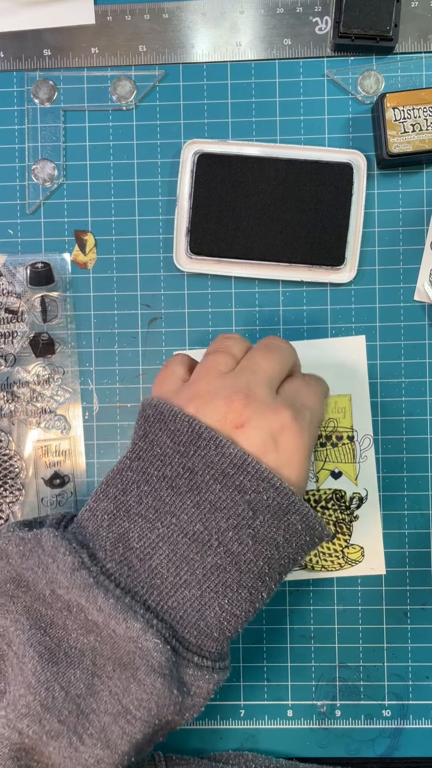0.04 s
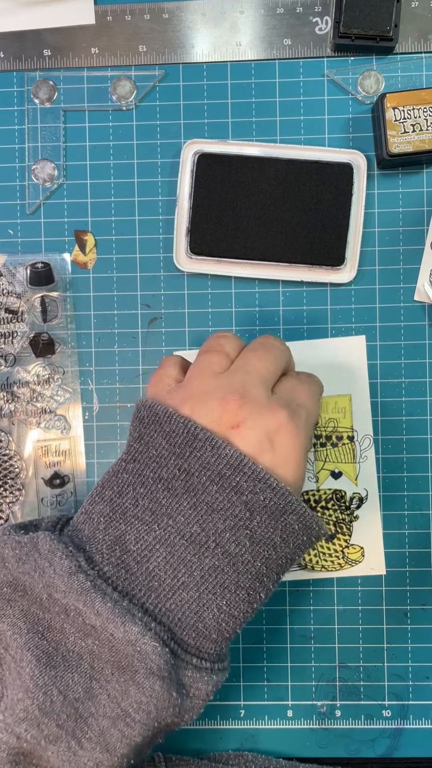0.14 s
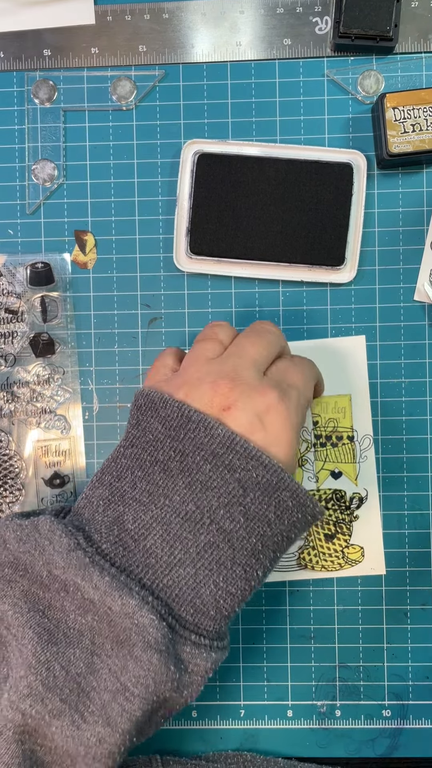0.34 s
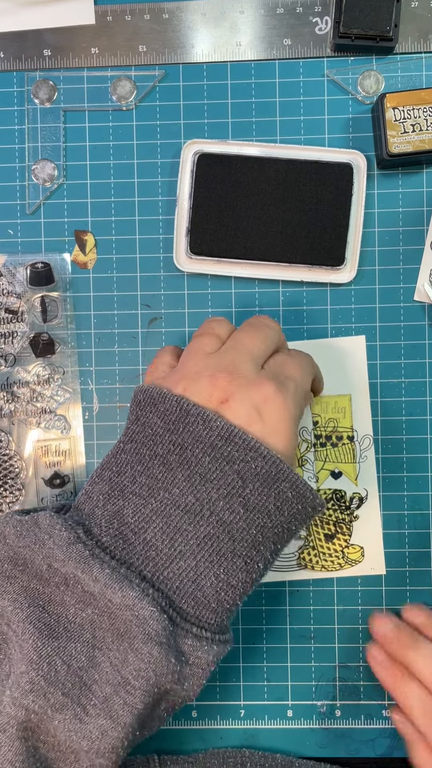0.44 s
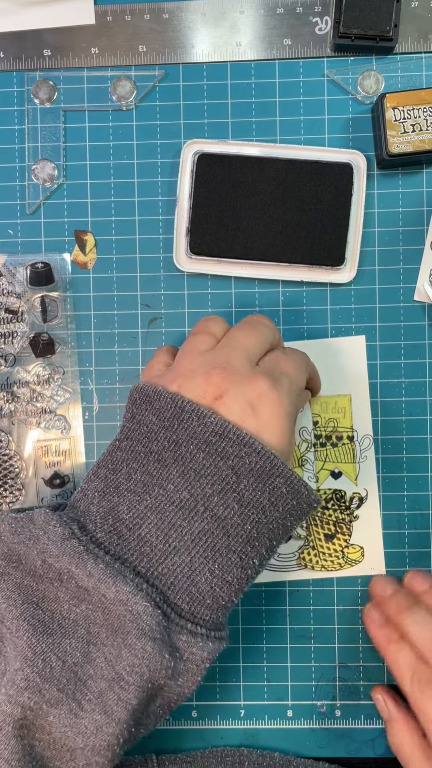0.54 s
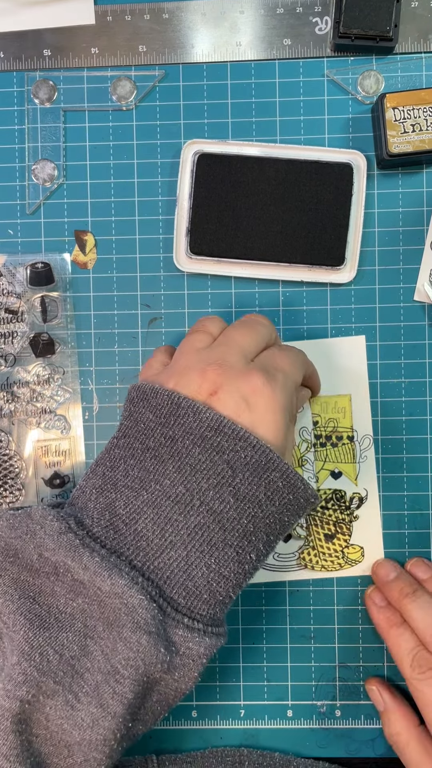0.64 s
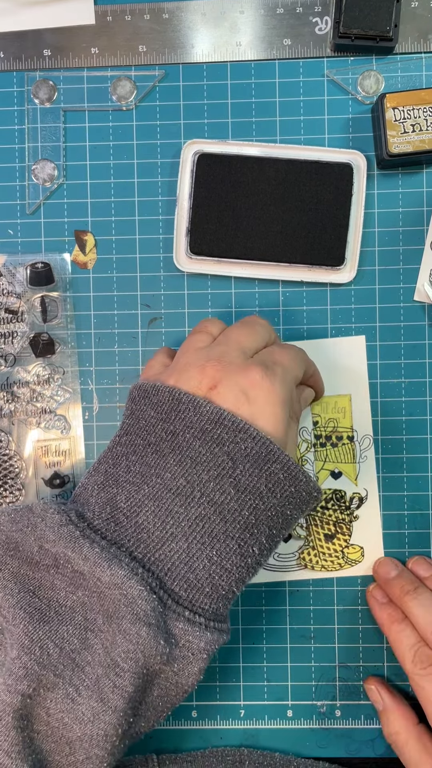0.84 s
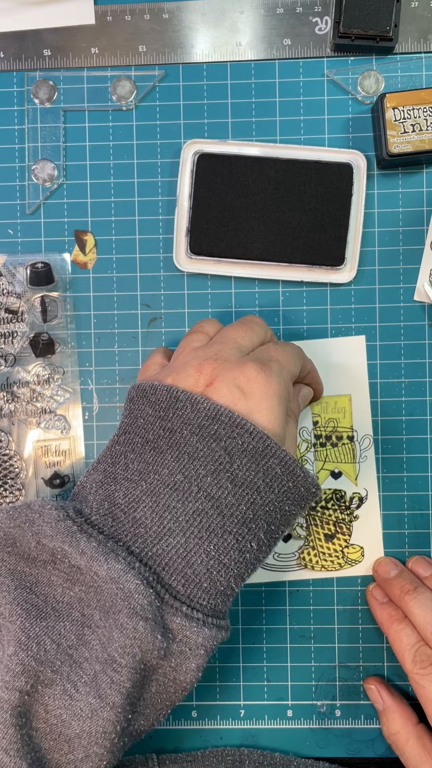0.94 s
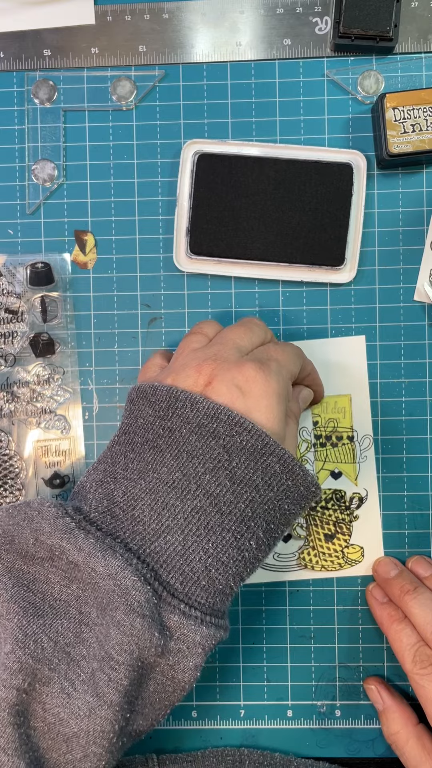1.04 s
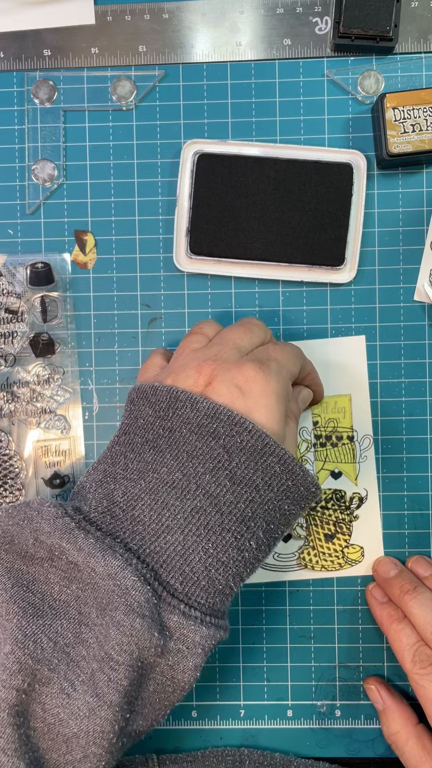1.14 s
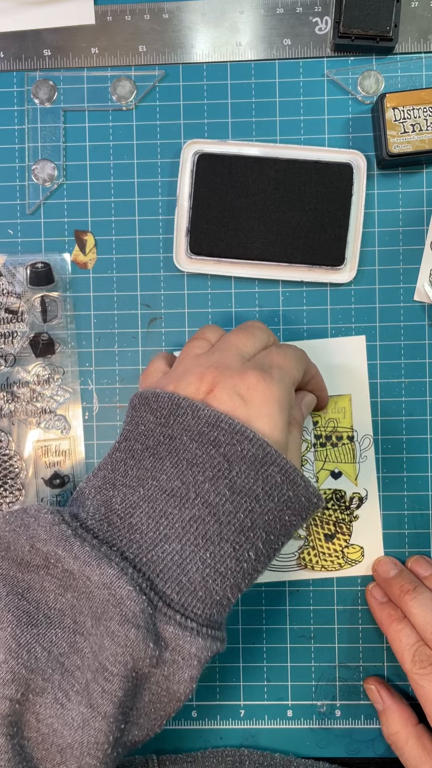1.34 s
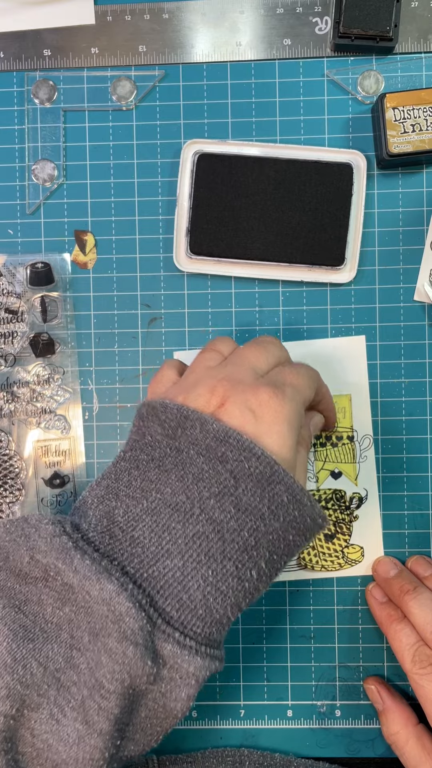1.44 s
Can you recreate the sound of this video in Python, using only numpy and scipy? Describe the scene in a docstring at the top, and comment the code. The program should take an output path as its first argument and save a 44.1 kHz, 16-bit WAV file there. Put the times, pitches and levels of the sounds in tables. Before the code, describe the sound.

A plastic block is set on a card: after a slight paper scrape, a dull table thump with a bright tick lands at 0.14 seconds, its short tail gone by 0.28. Very faint rubbing and tiny bumps follow, around 0.4 to 0.7, over a throbbing low hum that steadies after 1.0. From 1.42 the block crackles, snaps sharply at 1.46 and rattles briefly. Close, quiet room.

```python
"""Setting down a block

A hand sets an acrylic block down on a card on a craft table: one dull thump rings the table top (decaying tones),
with a bright tick and a short noise tail. Skin and paper rub (coloured noise, grainy in level).
The block crackles and snaps at the end (short noise bursts ringing its own tones, then a rattle).
A low hum (a wavering sine) throbs, then steadies, over a quiet room; two close microphone ports listen."""
import sys
import numpy as np
from scipy import signal
from scipy.fft import rfft, irfft, next_fast_len
from scipy.io import wavfile
from scipy.ndimage import uniform_filter1d

SR = 44100
rng = np.random.default_rng(int(sys.argv[2]) if len(sys.argv) > 2 else 0)


def unload_wav(signal):
    """Save mono or channel-first audio to the path in sys.argv[1] as 16-bit WAV at rate SR, clipped to [-1, 1]."""
    wavfile.write(
        sys.argv[1],
        SR,
        np.round(np.clip(np.atleast_2d(signal).T, -1, 1) * 32767).astype(np.int16),
    )


N = 66150  # 1.5 s
FFT_SIZE = next_fast_len(N + SR // 2)  # room after the end for ringing
T = np.arange(N) / SR  # time of each sample, s
F = np.maximum(np.arange(FFT_SIZE // 2 + 1) * SR / FFT_SIZE, 1)  # pitch of each bin, Hz


def db_to_gain(db):
    """Turn decibels into a plain multiplier."""
    return 10 ** (np.asarray(db) / 20)


def over_hz(table):
    """Read a (f/Hz, value) table at every bin, in straight lines on a log pitch axis."""
    hz, value = np.array(table, float).T
    return np.interp(np.log(F), np.log(hz), value)


def over_time(table, column=1):
    """Read one column of a time table at every sample, in straight lines."""
    rows = np.array(table, float)
    return np.interp(T, rows[:, 0], rows[:, column])


def shape(x, gain):
    """Filter a sound by one gain per bin."""
    return irfft(rfft(x, FFT_SIZE) * gain, FFT_SIZE)[..., :N]


def unit(x):
    """Scale a sound to an rms of 1."""
    return x / np.sqrt(np.mean(x ** 2))


def white():
    """Plain one-channel noise, equally strong at every pitch."""
    return rng.standard_normal(N)


def octave_bell(hz, octaves):
    """A smooth band around hz; its gain falls to 1/e this many octaves away."""
    return np.exp(-(np.log2(F / hz) / octaves) ** 2)


def colour(table):
    """Gain of a (f/Hz, level/dB) table, falling away below its first point."""
    return db_to_gain(over_hz(table)) * np.minimum(F / table[0][0], 1) ** 2


def walk(rate):
    """A wandering curve with a spread of about 1: random values, `rate` per second, joined by ramps."""
    hold = int(SR / rate)
    steps = np.repeat(rng.standard_normal(N // hold + 1), hold)
    return unit(uniform_filter1d(steps, hold))[:N]


def after(start_s, t60):
    """An envelope that starts at once and dies away by 60 dB in t60 seconds."""
    return (T >= start_s) * 1000. ** (-np.maximum(T - start_s, 0) / t60)


def modes(table, count=1):
    """Response of an object that rings in decaying tones; the sign turns every `count` tones."""
    ringing = 0
    for k, (hz, db, t60) in enumerate(table):
        sign = (-1) ** (k // count)
        ringing = ringing + sign * db_to_gain(db) * np.sin(2 * np.pi * hz * T) * 1000. ** (-T / t60)
    return rfft(ringing, FFT_SIZE)


# how alike left and right are for diffuse sound: f/Hz, correlation (1 = same, -1 = opposite)
LIKENESS = [(60, .99), (130, 0.98), (300, 0.25), (640, -0.43), (1400, .25), (3000, -0.0012), (5500, .93),
            (16000, 1)]


def air():
    """White stereo noise: a shared part and an opposed part set how alike the channels are."""
    alike = np.clip(over_hz(LIKENESS), -.99, .99)
    mid = shape(white(), np.sqrt((1 + alike) / 2))
    side = shape(white(), np.sqrt((1 - alike) / 2))
    return np.array([mid + side, mid - side])


# pushes on the table, the landing first: t/s, level/dB, contact time/ms
KNOCKS = [(.142, -14.5, 0.41), (.1, -55.5, 2.7), (0.127, -50.5, 2.3), (0.412, -68, 2.2), (0.523, -62.5, 2),
          (.64, -61, 5.3), (0.728, -63, 3.0), (0.901, -67, 2.3), (1.015, -56.5, 3.6), (1.384, -71.5, 3.8),
          (1.463, -76, 4.6)]
# tones the table top rings at: f/Hz, level/dB, t60/s (time to fall by 60 dB)
TABLE_MODES = [(61.53, -9.5, 0.23), (135.3, -1.5, 0.09), (194.5, -1, 0.082), (270.3, -22, .12),
               (327.2, -8.5, 0.087), (410.4, -16.5, 0.082), (523.8, -17.5, 0.059), (657, -15, 0.063),
               (772, -16.5, 0.03), (960, -15, .04), (1074, -17.5, 0.036), (1326, -18, .03),
               (1900, -24.5, 0.029), (99.4, -4, 0.077)]
# table sound, left minus right: f/Hz, level/dB
TABLE_PAN = [(60, 1), (110, -2), (200, -0.5), (380, -2.5), (700, -3.0), (1290, -4), (2380, 6), (4400, 0.5),
             (8120, 9), (15000, -4)]
TABLE_SIDE_DB = -17.5
LOWS_LATE_S, IN_PHASE_HZ = 0.00064, 540  # delay at 1 kHz, growing as 1 / Hz; pitch whose phase stays put


def table_top():
    """Each knock is a short push; the table brings the lows late; upper modes differ between the ports."""
    push = 0
    for start_s, db, contact_ms in KNOCKS:
        progress = np.clip((T - start_s) / (contact_ms / 1000), 0, 1)
        bump = np.sin(np.pi * progress) ** 2
        push = push + db_to_gain(db) * bump / bump.sum()
    late = np.exp(-2j * np.pi * LOWS_LATE_S * 1000 * np.log(F / IN_PHASE_HZ))
    mid = shape(push, late * modes(TABLE_MODES))
    upper_modes = modes(TABLE_MODES[5:-1], count=2)
    side = db_to_gain(TABLE_SIDE_DB) * shape(push, late * upper_modes)
    pan = db_to_gain(over_hz(TABLE_PAN) / 2)  # half the difference on each channel
    return shape(np.array([mid + side, mid - side]), np.array([pan, 1 / pan]))


# edge of the block meeting the card, and its tail in the room: f/Hz, level/dB at the start, t60/s
SLAP = [(159, -44.5, 0.61), (294, -34.5, 0.17), (600, -35, 0.17), (1260, -53.5, 0.19), (2340, -57.5, 0.2),
        (4500, -58.5, .2), (7500, -65, .12), (10400, -68, .1), (15000, -72.5, .1)]
SLAP_WIDTH = 0.58  # share of full stereo noise, the rest is its mono average
TICK_DB, TICK_HZ, TICK_S = -32, 2530, 0.0023  # level, pitch where the gain is halved, time to fall to 1/e
TAIL_END_S, TAIL_FADE_S = 0.2506, .03  # the tail of the landing stops short


def slap():
    """The block lands: a bright tick, then noise that dies band by band."""
    landing_s = KNOCKS[0][0]
    wide = air()
    noise = SLAP_WIDTH * wide + (1 - SLAP_WIDTH) * wide.mean(axis=0)
    tick_colour = 1 / (1 + (F / TICK_HZ) ** 2) * np.minimum(F / 870.0, 1)  # also thin below 870 Hz
    tick = unit(shape(white(), tick_colour))
    tick_fall = (T >= landing_s) * np.exp(-np.maximum(T - landing_s, 0) / TICK_S)
    out = db_to_gain(TICK_DB) * tick * tick_fall
    tail_stop = np.interp(T, [TAIL_END_S, TAIL_END_S + TAIL_FADE_S], [1, 0])
    for hz, db, t60 in SLAP:
        band = unit(shape(noise, octave_bell(hz, 0.52)))
        out = out + db_to_gain(db) * after(landing_s, t60) * tail_stop * band
    return out


# noise bursts of the block: t/s, level/dB, centre f/Hz, added treble level/dB
CLICKS = [(1.4247, -60, 2960, -30), (1.4294, -46, 3975, -11), (1.4353, -46.5, 4080, -33),
          (1.4423, -50, 3025, -33), (1.446, -53, 3500, -10), (1.4505, -44.5, 2500, -31),
          (1.4521, -41, 3000, -17), (1.4572, -41, 2500, -16), (1.4604, -39.5, 2240, -19),
          (1.4607, -31.5, 2110, 1), (1.4624, -27, 1474, -3.5), (1.4618, -38, 980, 18),
          (1.4706, -50, 2540, -19), (1.477, -49, 3000, -12), (1.484, -50, 4460, -25)]
# tones the block rings at: f/Hz, level/dB, t60/s
BLOCK_MODES = [(700, -3, .04), (1480, -3, .035), (2090, -5, .03), (2700, -6, .03), (3130, -8, .025),
               (4258, -8, .025), (5400, -8, .02), (10280, -10, .015)]
CLICK_OCTAVES, CLICK_TREBLE_HZ, CLICK_T60_S = 1.55, 7500, .008  # band reach, start of the treble, decay
RING_DB = -36  # gain from the bursts into the ringing
CLICK_BASS_HZ = 550  # the block is too small to sound below this


def clicks():
    """Short noise bursts crackle and ring the block."""
    bursts = 0
    for start_s, db, hz, treble_db in CLICKS:
        treble = db_to_gain(treble_db) / (1 + (CLICK_TREBLE_HZ / F) ** 4)
        burst = unit(shape(white(), octave_bell(hz, CLICK_OCTAVES) + treble))
        bursts = bursts + db_to_gain(db) * burst * after(start_s, CLICK_T60_S)
    ring = db_to_gain(RING_DB) * shape(bursts, modes(BLOCK_MODES))
    return shape(bursts + ring, 1 / (1 + (CLICK_BASS_HZ / F) ** 6))


# colour of the rattle that follows the loudest click: f/Hz, level/dB
RATTLE_COLOUR = [(550, -17), (750, -6.5), (1500, -4.5), (2200, -0.5), (3200, -8), (5000, -9), (7500, -1.5),
                 (10500, -16), (13000, -19), (16000, -27)]
RATTLE_S, RATTLE_DB, RATTLE_T60_S = 1.462, -40, 0.097  # start, level at the start, decay


def rattle():
    """The loudest click leaves dying noise whose level jitters quickly, so it sounds grainy."""
    noise = unit(shape(air(), colour(RATTLE_COLOUR)))
    grainy_level = db_to_gain(RATTLE_DB + 2.0 * walk(400))
    return noise * grainy_level * after(RATTLE_S, RATTLE_T60_S)


GRAIN_DB = 2  # quick level jitter of both kinds of rubbing


def friction(colour_table, level_table, drift_db, drift_rate):
    """Rubbing makes coloured noise whose level follows the motion, with quick grain and slower drift."""
    noise = unit(shape(air(), colour(colour_table)))
    level_db = over_time(level_table) + GRAIN_DB * walk(200) + drift_db * walk(drift_rate)
    return noise * db_to_gain(level_db)


# loudness of skin and sleeve rubbing: t/s, level/dB
HISS = [(0.0, -100), (0.058, -82.5), (0.102, -94), (0.11, -86), (0.134, -101), (0.138, -85), (0.142, -53.5),
        (0.166, -78.5), (0.276, -92), (0.502, -83), (0.522, -68), (0.562, -74.5), (0.578, -68),
        (0.618, -67), (0.65, -83.5), (0.678, -73.5), (0.728, -99), (1.296, -100), (1.332, -83),
        (1.352, -88), (1.425, -67)]
# colour of that hiss: f/Hz, level/dB
HISS_COLOUR = [(3000, -14.5), (5000, -12), (7500, 0.5), (10500, -2), (13000, -8), (16000, -11.5)]


def skin_and_sleeve():
    """Skin and sleeve rub with a bright hiss of friction noise."""
    return friction(HISS_COLOUR, HISS, drift_db=1.1, drift_rate=35)


# loudness of paper sliding: t/s, level/dB
SCRAPE = [(0, -85), (.05, -84), (.09, -77.5), (.11, -66), (.138, -53.5), (.15, -85), (.36, -86.5),
          (.42, -75.5), (.48, -81), (.53, -79.5), (.62, -75.5), (.7, -77), (.8, -84.5), (.97, -89.5),
          (1.03, -84), (1.09, -102.5), (1.4, -96), (1.43, -76.5), (1.5, -67)]
# colour of that scrape: f/Hz, level/dB
SCRAPE_COLOUR = [(200, -7.5), (680, 6.5), (1200, -4), (2000, -3.5), (3500, -14.5), (5200, -13),
                 (7500, -17.5), (12000, -28)]


def paper():
    """Paper slides with a duller scrape of friction noise."""
    return friction(SCRAPE_COLOUR, SCRAPE, drift_db=2.9, drift_rate=30)


# faint rubs in one band: start t/s, length/s, centre f/Hz, width/Hz, level/dB
RUBS = [(0.026, 0.089, 1870, 120, -80), (0.025, 0.087, 4200, 700, -85.5), (.1, .045, 3800, 2500, -75),
        (.37, 0.11, 2340, 700, -83.5), (0.64, 0.071, 740, 310, -79), (0.758, 0.19, 690, 400, -82.5),
        (1, 0.085, 640, 330, -77.5), (0.605, 0.18, 1570, 202, -85.5), (0.47, 0.2, 2340, 1700, -78),
        (0.496, 0.15, 5600, 2200, -80.5), (.39, 0.15, 4770, 1700, -87)]


def narrow_rubs():
    """Faint rubs, each a narrow band of noise that swells and fades."""
    noise, out = air(), 0
    for start_s, length_s, hz, width_hz, db in RUBS:
        swell = np.sin(np.pi * np.clip((T - start_s) / length_s, 0, 1)) ** .5
        band = np.exp(-((F - hz) / width_hz * 2) ** 2)
        out = out + db_to_gain(db) * swell * unit(shape(noise, band))
    return out


# path of the low hum: t/s, f/Hz, level/dB
HUM = [(0.26, 63.9, -48), (0.276, 65.7, -52), (0.31, 64.5, -55.5), (0.352, 63.9, -72), (0.466, 64.1, -63),
       (0.498, 62.2, -71), (0.528, 58.72, -55.5), (0.55, 55.2, -60.5), (0.574, 55.6, -69.5),
       (0.604, 55, -54.5), (0.628, 54.3, -60), (0.66, 54.7, -69.5), (0.702, 55.5, -57), (0.766, 56.96, -73),
       (0.826, 58.5, -72.5), (0.898, 58.2, -75), (0.956, 58.7, -66), (0.978, 58.5, -74.5),
       (1.012, 58.4, -56), (1.046, 58.2, -54.5), (1.088, 58.73, -58), (1.178, 60.2, -57),
       (1.358, 63.2, -58.5), (1.378, 63.7, -58.5), (1.5, 65.3, -50.5)]
HUM_WAVER, HUM_ONSET_S = 0.034, 0.027  # share of the pitch; fade-in


def hum():
    """A low sine near the lowest table mode throbs under the hand, then steadies and rises."""
    hz = over_time(HUM) * (1 + HUM_WAVER * walk(23))
    phase = 2 * np.pi * np.cumsum(hz) / SR
    tone = np.sqrt(2) * np.sin(phase)  # rms 1
    fade_in = np.interp(T, [HUM[0][0], HUM[0][0] + HUM_ONSET_S], [0, 1])
    return fade_in * tone * db_to_gain(over_time(HUM, column=2) + 1.7 * walk(25))


# colour of the quiet room: f/Hz, level/dB per Hz
ROOM = [(30, -10), (60, 0.5), (100, -9), (200, -14.5), (400, -23.5), (800, -29.5), (1600, -35.5),
        (3000, -39), (5000, -43.5), (7500, -41), (10500, -50.5), (13000, -52.5), (16000, -45.5)]


def room():
    """The quiet room is steady diffuse noise, strongest in the bass."""
    return unit(shape(air(), colour(ROOM))) * db_to_gain(-69)


def scene():
    """All sources added together over the room floor."""
    block = table_top() + slap() + clicks() + rattle()
    rubbing = skin_and_sleeve() + paper() + narrow_rubs()
    low_hum = hum()
    return block + rubbing + low_hum + room()


# phase by which the left port leads: f/Hz, phase/radians
PORTS = [(300, 0), (1290, -.1), (2840, .9), (3700, .3), (4500, 1.1), (5170, .1), (6900, 2.7), (7750, 3.14),
         (8500, 3.6), (10000, 5.5), (12400, 7.4), (13300, 8.8), (14300, 9.42), (15400, 10.5), (16400, 10.5)]
BASS_CUT_HZ, TOP_HZ = 40, 16600


def record(dry):
    """The two ports hear the treble out of phase; deep bass and the top are cut."""
    turn = np.exp(.5j * over_hz(PORTS))  # half the lead on each channel
    wet = shape(dry, np.array([turn, 1 / turn]))
    bass_cut = signal.butter(3, BASS_CUT_HZ, "high", fs=SR, output="sos")
    top_cut = signal.ellip(10, .2, 80, TOP_HZ, fs=SR, output="sos")
    return signal.sosfilt(top_cut, signal.sosfilt(bass_cut, wet))


dry = scene()
out = record(dry)
unload_wav(out)
```